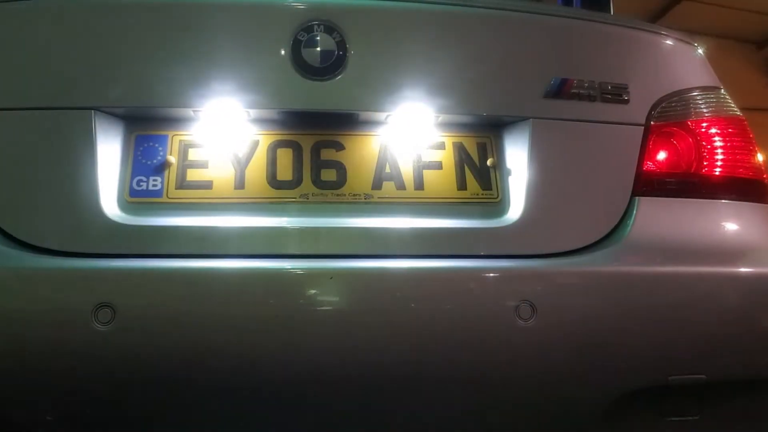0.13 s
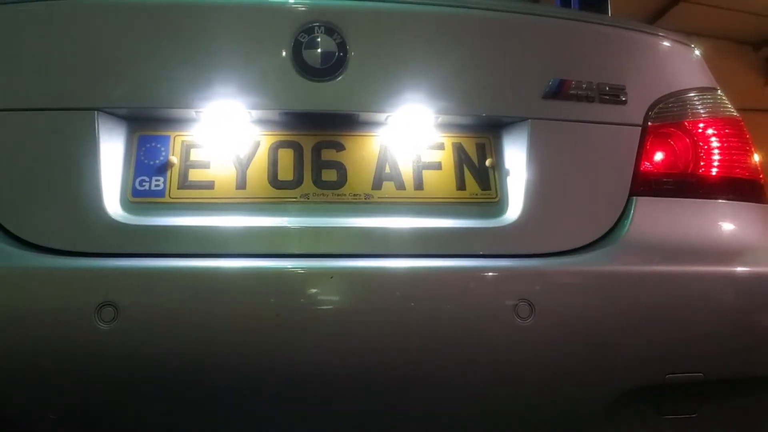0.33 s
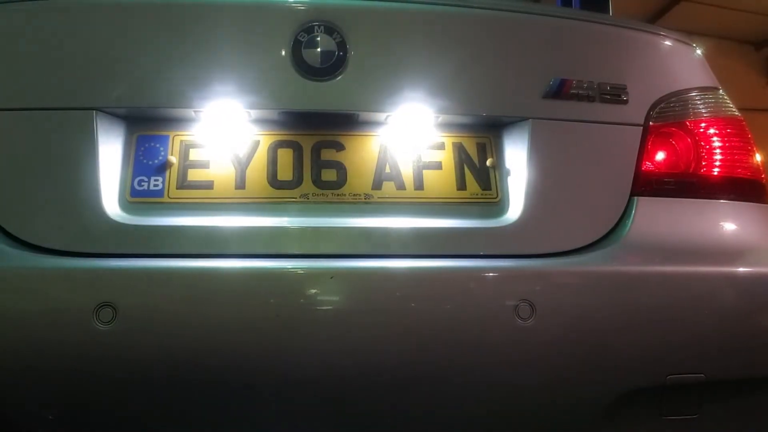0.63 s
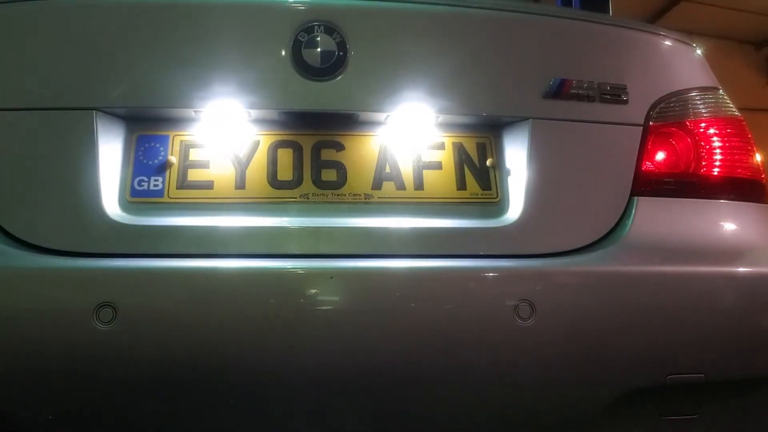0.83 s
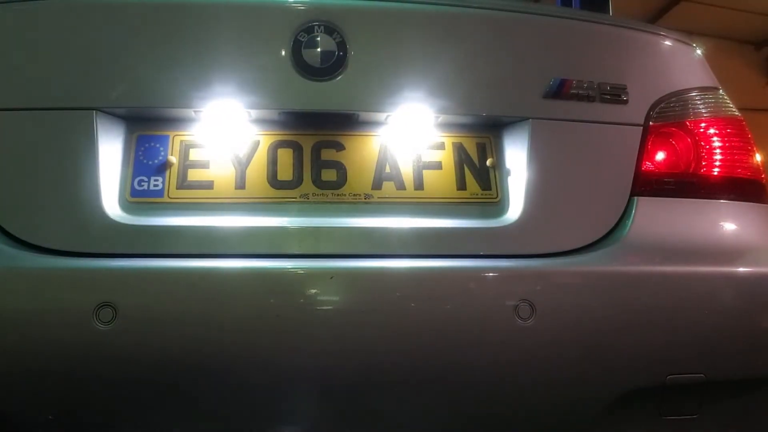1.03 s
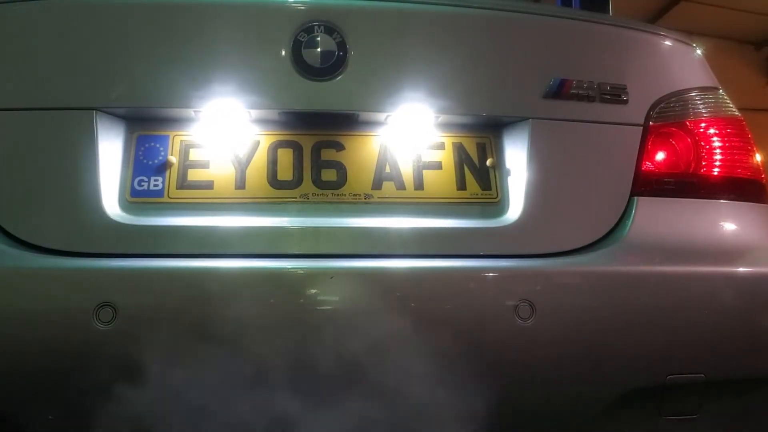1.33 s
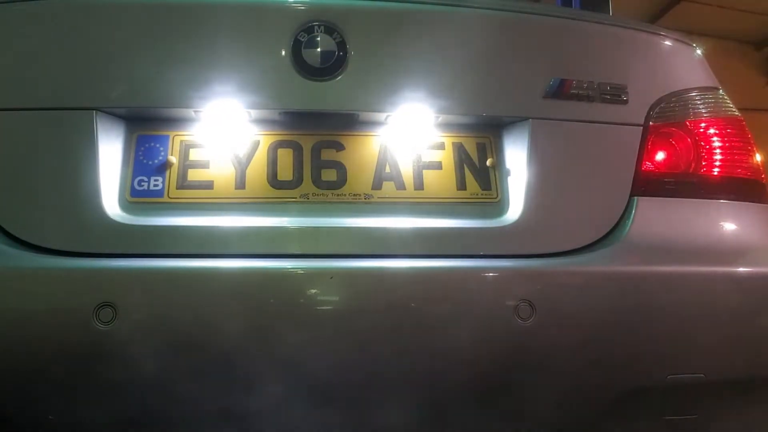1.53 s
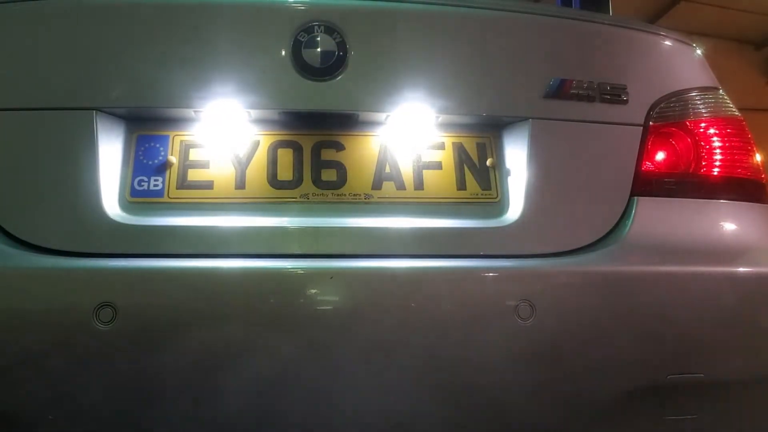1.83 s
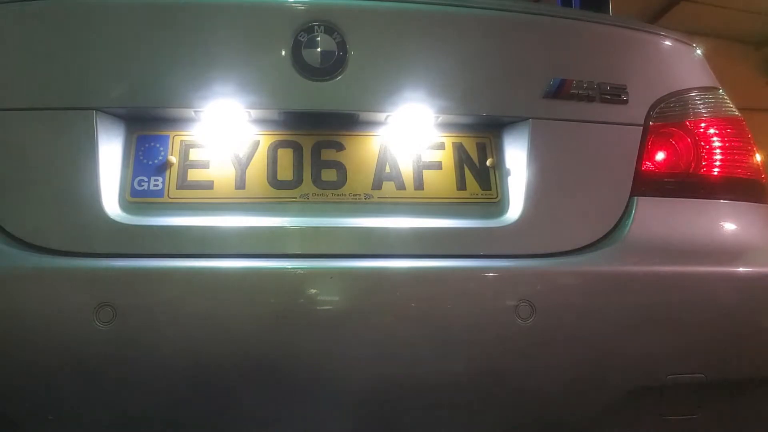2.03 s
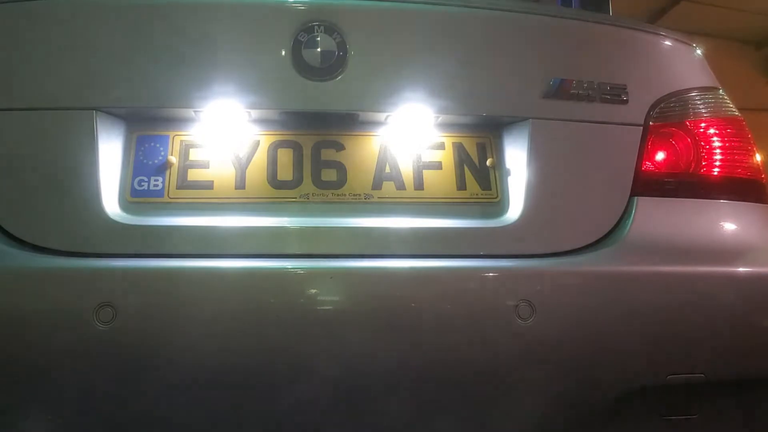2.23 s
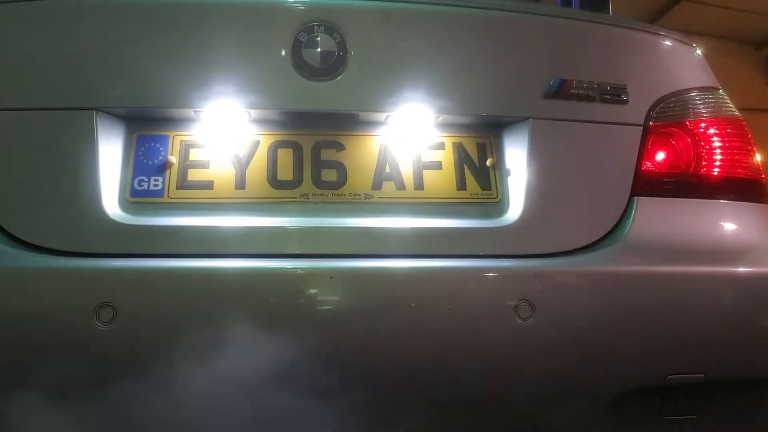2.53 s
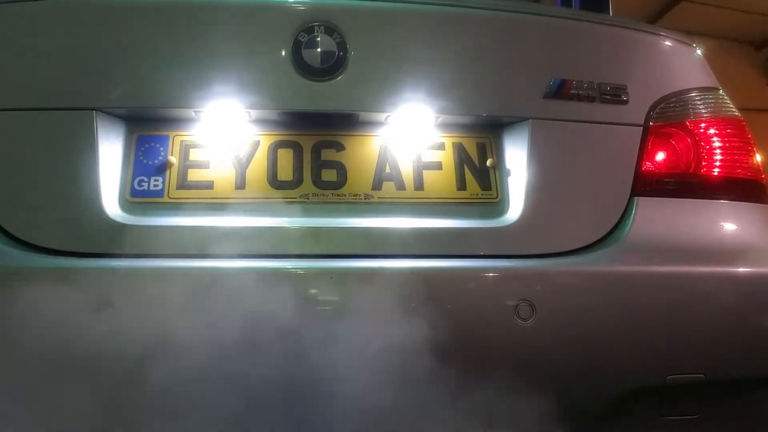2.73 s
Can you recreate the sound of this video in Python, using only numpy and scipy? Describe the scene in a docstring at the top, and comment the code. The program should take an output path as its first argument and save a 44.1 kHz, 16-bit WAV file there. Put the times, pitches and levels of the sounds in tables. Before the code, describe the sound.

A car engine settles to a low, thumping idle, heard close behind the tailpipes. It then revs up steadily, the drone growing louder and rougher with light metallic ticks, and the exhaust pops sharply twice near the end.

```python
"""A ten-cylinder car engine, close behind its tailpipes: it settles to idle, then climbs on the throttle.
Low multiples of the firing rate drone as clean tones. Each firing thumps, ticks the metal and puffs
gas noise through the pipe's resonances, and a growl joins as the revs rise. Some firings snap harder;
unburnt fuel pops, faintly early on and twice sharply near the end. Fizz and a faint hiss sit on top."""
import sys
import numpy as np
from scipy import signal
from scipy.fft import rfft, irfft, next_fast_len
from scipy.io import wavfile
from scipy.ndimage import uniform_filter1d, map_coordinates

SR = 44100
rng = np.random.default_rng(int(sys.argv[2]) if len(sys.argv) > 2 else 0)


def bounce(signal):
    """Save signal as a 16-bit WAV file at the path given by the first command-line argument."""
    frames = np.transpose(np.atleast_2d(signal))
    limited = np.clip(frames, -1, 1)
    pcm = np.round(limited * 32767).astype(np.int16)
    wavfile.write(sys.argv[1], SR, pcm)


N = 127449


def engine():
    """The firing rate drives the drone and times the thumps, ticks and gas puffs."""
    # The rev curve: time_s, firing_hz, level_db of multiples 1, 2, 3, 4, 5, 6, 8, gas_db, fizz_db
    revs = [(0.0, 75.15, -26, -44, -28.5, -41, -28, -51, -39, -30.5, -63),
            (0.14, 66.64, -34, -22, -35, -46, -40, -37, -33.5, -32.5, -62),
            (0.198, 63.93, -31, -26, -31, -40, -27.5, -42, -34, -30.5, -60.5),
            (0.29, 60.78, -42, -23.5, -34.5, -38, -28, -38, -49, -33, -60.5),
            (0.43, 57.95, -31.5, -22, -35.5, -49, -40, -46.5, -46, -34, -58.5),
            (0.73, 59.2, -34, -20.5, -34, -49, -27, -50, -39, -33.5, -57),
            (0.812, 59.42, -31.5, -22, -33.5, -48, -42.5, -46, -41, -34, -58),
            (1.09, 57.16, -35.5, -21.5, -33, -41, -28, -40, -43, -32.5, -57),
            (1.149, 57.32, -33, -20, -31, -50, -39.5, -51, -43, -33, -57),
            (1.3, 63.15, -26.5, -22, -27, -31.5, -24, -40.5, -46, -29, -54.5),
            (1.36, 65.85, -22.5, -20.5, -21.5, -32.5, -35, -31.5, -30, -30, -53.5),
            (1.51, 70.05, -17.5, -23.5, -22.5, -32, -33.5, -42, -41.5, -32.5, -55.5),
            (1.711, 72.5, -13, -30.5, -19.5, -36.5, -43, -39, -46, -28.5, -51.5),
            (1.78, 73, -12.5, -37.5, -18.5, -35, -29.5, -44, -53, -27, -50),
            (1.98, 79.12, -10.5, -29, -20, -28.5, -33, -33, -35.5, -29.5, -55.5),
            (2.251, 80.95, -15.5, -40, -18, -35.5, -34.5, -34, -36, -29.5, -53.5),
            (2.388, 85.28, -18.5, -36, -22, -31.5, -52, -32.5, -55, -29, -52.5),
            (2.45, 88.42, -16.5, -35.5, -23.5, -54, -49, -30.5, -36, -29.5, -55.5),
            (2.58, 92.54, -18, -35.5, -21.5, -28, -45, -26, -51, -25.5, -51.5),
            (2.7, 97.06, -19.5, -30, -23, -40, -36, -26.5, -45, -25, -49),
            (2.75, 101.1, -22.5, -25.5, -19.5, -31, -28, -27, -36, -24, -51),
            (2.809, 106.8, -19.5, -31, -19.5, -30, -27, -23.5, -51, -24.5, -47),
            (2.89, 113.4, -20.5, -26, -35.5, -38.5, -22.5, -34, -34.5, -25.5, -50)]
    # Strength of the five firings in one crank turn: level_db
    cylinders = [1.5, -0.3, 0.8, -0.21, 0.61]
    firing_hz, *drone_db, gas_db, fizz_db = curves(revs)
    cycles = np.cumsum(firing_hz) / SR
    fired = np.flatnonzero(np.diff(np.floor(cycles)))  # the sample of each firing
    size_db = np.resize(cylinders, len(fired))
    tones = drone(firing_hz, cycles, drone_db, gas_db)
    flow = puffs(fired, size_db)
    gas = amp(1.5) * rasp(flow) + amp(-1.5) * thumps(fired, size_db, firing_hz)
    gas += amp(-9) * ticks(fired, size_db) + amp(-4.5) * growl(firing_hz)
    air = amp(fizz_db + 4) * fizz(flow)
    air += amp(-65.5 + 0.28 * drone_db[0]) * hiss()  # swells a little with the lowest tone
    return tones + amp(gas_db) * gas + air


def drone(firing_hz, cycles, drone_db, gas_db, waver_db=1.19, flutter_db=0.2935):
    """Wavering tones at multiples of the firing rate; the top ones swell on crossing a pipe resonance."""
    # The body of the drone: multiple of the firing rate
    low_multiples = [1, 2, 3, 4, 5, 6, 8]
    # Overtones coloured by the pipe: multiple of the firing rate
    high_multiples = [9, 10, 11]
    # Swell of the seventh multiple: time_s, level_db
    seventh_swell = [(1.2, -46), (1.45, -39.5), (2.3, -46), (2.47, -29), (2.62, -30), (2.89, -40)]
    low = sum(amp(db + waver_db * wobble(14) + flutter_db * k * wobble(45)) * tone(k, cycles)
              for k, db in zip(low_multiples, drone_db))
    high = sum(amp(gas_db - 10.5 + 4.5 * wobble(9.17)) * pipe(k * firing_hz) * tone(k, cycles)
               for k in high_multiples)
    seventh = amp(curves(seventh_swell)[0] + waver_db * wobble(14)) * tone(7, cycles)
    return low + high + seventh


def tone(k, cycles, drift_cycles=0.21):
    """Multiple k of the firing rate; higher ones sway more between left and right."""
    sway = 1 + 1j * k * amp(-28) * wobble(23) * np.array([[1], [-1]])
    # The first and third keep step, which squares off the wave; the others wander.
    drift = (k not in (1, 3)) * min(k / 4, 1) * drift_cycles * wobble(5)
    offset = 0.25 if k % 2 == 0 else 0
    return np.sqrt(2) * np.imag(sway * np.exp(2j * np.pi * (k * cycles + offset + drift)))


def puffs(fired, size_db, scatter_db=4, rise_s=0.0058):
    """The envelope of the gas flow: one rounded puff per firing."""
    puff_db = size_db + scatter_db * rng.standard_normal(len(fired))
    flow = unit(bursts(np.c_[fired / SR, puff_db], decay_s=0.0057))
    return uniform_filter1d(flow, size=int(rise_s * SR))


def rasp(flow, steady_flow=1.6):
    """Gas rushes through the tailpipe, puffs riding on an unbroken stream."""
    return unit(stereo(steady_flow + flow, pipe))


def pipe(hz):
    """The tailpipe's gain: narrow resonances over a broad bed."""
    # Pipe resonances: pitch_hz, width_hz, level_db
    modes = [(515, 29, -4.5), (599, 50, -8), (905.7, 25.7, -1), (1130, 100, -11), (1199, 30, -3.5),
             (1529.4, 24, -7.5), (1897, 68.3, -6), (2183, 22, -13), (2420, 25, -18), (2626, 67, -17.5)]
    # Gas noise between the resonances: frequency_hz, level_db
    bed = [(60, -60.5), (150, -26.5), (300, -7.5), (600, -9.5), (1200, -13), (1400, -28), (2600, -25),
           (3200, -24.5), (3500, -42.5), (5500, -100)]
    power = sum(np.abs(amp(db) * hz * width / (pitch ** 2 - hz ** 2 + 1j * hz * width)) ** 2
                for pitch, width, db in modes)
    rolloff = 1 + (hz / 3200) ** 12
    return np.sqrt(amp(2) ** 2 * power / rolloff + amp(along(bed, hz)) ** 2)


def thumps(fired, size_db, firing_hz, smooth_from_hz=84, fade_db_per_hz=1):
    """Unequal cylinders make a low lope that fades as the engine smooths out at higher revs."""
    # Tone of the thump: frequency_hz, level_db
    colour = [(50, -15.5), (65, 2), (90, 4.5), (150, -9.5), (250, 0), (350, -6.5), (500, -31.5),
              (1500, -120)]
    uneven = amp(size_db) - amp(size_db).mean()
    lope = unit(filtered(np.bincount(fired, uneven, N), lambda hz: amp(along(colour, hz))))
    return amp(-fade_db_per_hz * np.maximum(firing_hz - smooth_from_hz, 0)) * lope


def growl(firing_hz, full_hz_per_s=76):
    """A rough low-mid roar that opens up while the engine accelerates."""
    # Tone of the roar: frequency_hz, level_db
    colour = [(200, -36.5), (300, 1.5), (450, -13.5), (600, 5), (800, -40.5)]
    climb = uniform_filter1d(np.gradient(firing_hz) * SR, size=SR // 10)
    roar = unit(stereo(amp(1.2 * wobble(30)), lambda hz: amp(along(colour, hz)) * (hz < 800)))
    return np.clip(climb / full_hz_per_s, 0, 1) * roar


def ticks(fired, size_db, jitter_s=0.0006, scatter_db=3.5):
    """Every firing strikes the pipe's metal, a little loose in timing and force."""
    timing, force = rng.standard_normal((2, len(fired)))
    struck = np.clip(fired + jitter_s * SR * timing, 0, N - 1).astype(int)
    return unit(metal_ring(np.bincount(struck, amp(size_db + scatter_db * force), N)))


def metal_ring(blows, pitch_hz=1891, width_hz=61, rise_s=0.0011):
    """Blows ring one short-lived metal mode of the pipe."""
    t = np.arange(SR // 20) / SR
    envelope = np.exp(-np.pi * width_hz * t) * (1 - np.exp(-t / rise_s))
    return signal.fftconvolve(blows, envelope * np.sin(2 * np.pi * pitch_hz * t))[:N]


def snaps():
    """Harder firings ring the metal and spit through the pipe's upper resonances."""
    # Hard firings: start_s, level_db
    hits = [(0.1237, -19), (0.8086, -26.5), (0.843, -26), (0.8616, -23.5), (1.07, -28.5), (1.1572, -29.5),
            (1.2575, -24.5), (1.2751, -22), (1.3212, -18.5), (1.3504, -24.5), (1.4692, -31), (1.5411, -21),
            (1.5557, -21.5), (1.64, -27.5), (1.669, -22.5), (1.6833, -20.5), (1.8203, -17.5), (2.152, -22),
            (2.2236, -21.5), (2.441, -24.5), (2.5894, -22), (2.6324, -21), (2.7058, -14.5), (2.7452, -19),
            (2.7909, -18.5)]
    start_s, level_db = np.transpose(hits)
    ring = metal_ring(np.bincount((start_s * SR).astype(int), amp(level_db + 2), N))
    upper_pipe = lambda hz: pipe(hz) * (hz > 1000)
    spit = stereo(bursts(hits, decay_s=0.01), upper_pipe) / np.std(stereo(1, upper_pipe))
    return ring + amp(-6.5) * spit


def pops():
    """Unburnt fuel cracks in the pipe, bright and short."""
    # Fuel pops: start_s, level_db
    hits = [(0.122, -50.5), (2.7032, -35), (2.7909, -30)]
    # Tone of the crack: frequency_hz, level_db
    colour = [(600, -5.5), (1500, 11.5), (3500, 11.5), (7000, -9.5), (14000, -18.5)]
    return amp(6) * stereo(bursts(hits, decay_s=0.0083), lambda hz: amp(along(colour, hz)))


def fizz(flow, steady_flow=3.6):
    """The bright edge of the gas noise, pulsing lightly with the puffs."""
    # Tone of the fizz: frequency_hz, level_db
    colour = [(2500, -33), (3300, -0.5), (4500, -1), (5500, -6), (6400, -4), (7000, -15.5), (7800, -31.5),
              (9000, -64.5)]
    return unit(stereo(steady_flow + flow, lambda hz: amp(along(colour, hz)) * (hz > 2500)))


def hiss():
    """Smooth noise at the very top."""
    # Tone of the hiss: frequency_hz, level_db
    colour = [(7000, -32), (9500, 5), (11500, 4.5), (14800, -18.5)]
    return unit(stereo(1, lambda hz: amp(along(colour, hz)) * (hz > 7000)))


def amp(db):
    """dB to gain."""
    return 10 ** (np.asarray(db) / 20)


def unit(x):
    """Scale to rms 1."""
    return x / np.sqrt(np.mean(x ** 2) + 1e-20)


def curves(rows):
    """Rows of (time_s, values...) as one running curve per value."""
    time_s, *columns = np.transpose(rows)
    return [np.interp(np.arange(N) / SR, time_s, column) for column in columns]


def along(points, hz):
    """Read (frequency_hz, value) points on a log frequency axis."""
    knots_hz, values = np.transpose(points)
    return np.interp(np.log(hz + 1), np.log(knots_hz + 1), values)


def wobble(rate):
    """A smooth random curve, rate knots a second."""
    return map_coordinates(rng.standard_normal(int(N * rate / SR) + 4), [np.arange(N) * rate / SR])


def bursts(events, decay_s):
    """An envelope that jumps at each (start_s, level_db) and dies away."""
    start_s, level_db = np.transpose(events)
    kicks = np.bincount(np.clip(start_s * SR, 0, N - 1).astype(int), amp(level_db), N)
    return signal.fftconvolve(kicks, np.exp(-np.arange(SR // 10) / SR / decay_s))[:N]


def filtered(x, response):
    """Shape x with a complex frequency response."""
    size = next_fast_len(N + SR // 2)
    return irfft(rfft(x, size) * response(np.fft.rfftfreq(size, 1 / SR)), size)[..., :N]


def stereo(envelope, response):
    """Noise under an envelope, coloured, partly alike left and right."""
    # Likeness of left and right: frequency_hz, correlation
    likeness = [(100, 0.82), (300, 0.28), (700, 0.75), (1500, 0.6), (3000, 1), (5000, 0.2), (12000, .85)]
    spread = lambda hz: np.arccos(np.clip(along(likeness, hz), -1, 1)) / 2
    noise = envelope * rng.standard_normal((2, N))
    mid, side = filtered(noise, lambda hz: response(hz) * [np.cos(spread(hz)), np.sin(spread(hz))])
    return np.array([mid + side, mid - side])


def scene():
    """Everything comes from the tailpipes."""
    return engine() + snaps() + pops()


def record(dry, left_lag_s=0.00008, top_hz=14800):
    """Two exhaust ports, the left a touch later and differently coloured; the extreme treble is cut."""
    # Stereo balance: frequency_hz, left_over_right_db
    balance = [(100, -.1), (500, .6), (1500, 1.2), (3000, 2), (5500, 6.5), (8000, -8), (12000, -4)]
    side = np.array([[0.5], [-0.5]])
    delay = lambda hz: np.exp(-2j * np.pi * hz * side * left_lag_s)
    return filtered(dry, lambda hz: amp(side * along(balance, hz)) * delay(hz) * (hz < top_hz))


dry = scene()
out = record(dry)
bounce(out)
```